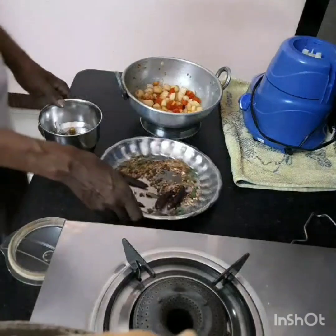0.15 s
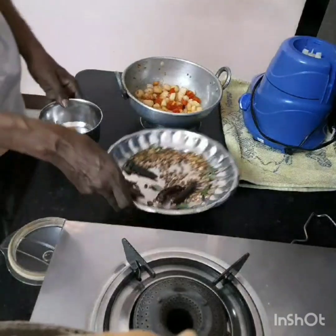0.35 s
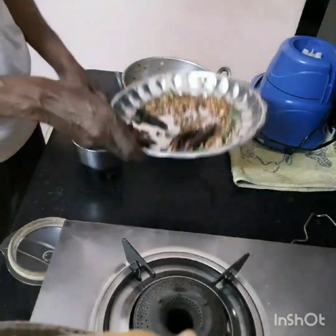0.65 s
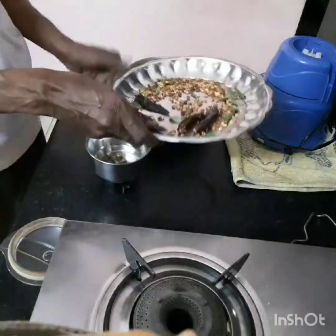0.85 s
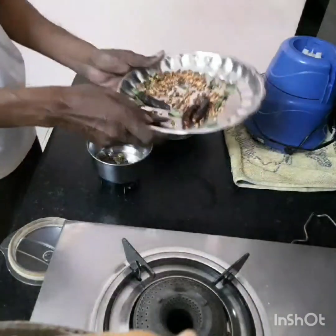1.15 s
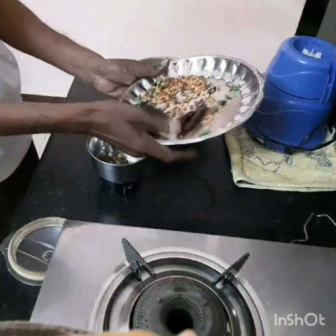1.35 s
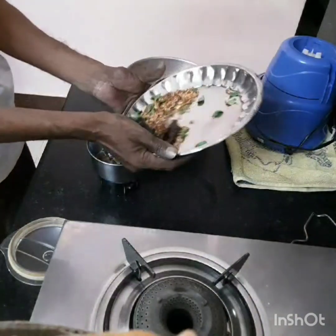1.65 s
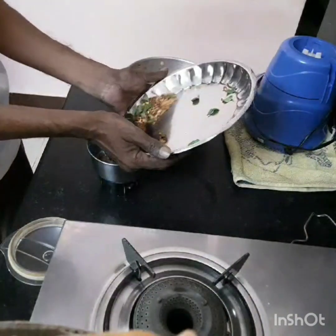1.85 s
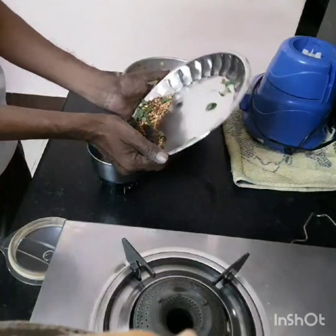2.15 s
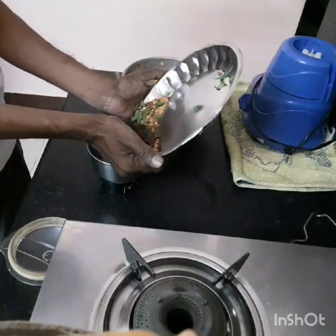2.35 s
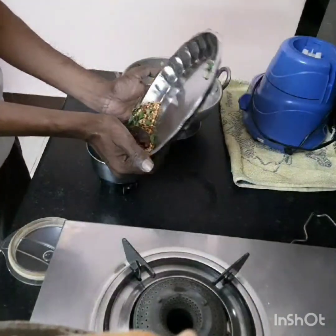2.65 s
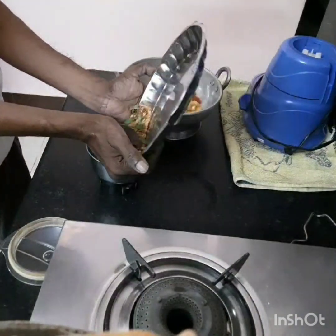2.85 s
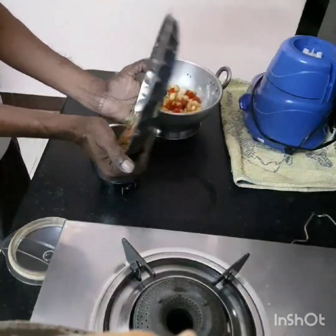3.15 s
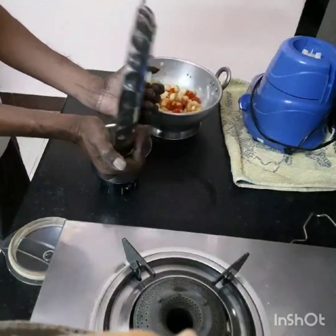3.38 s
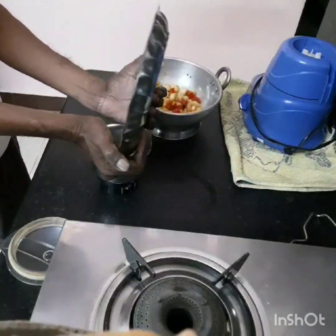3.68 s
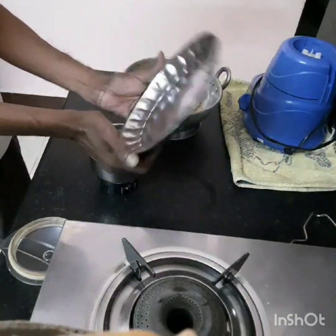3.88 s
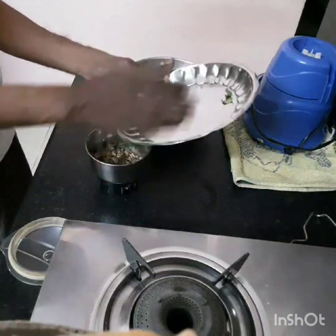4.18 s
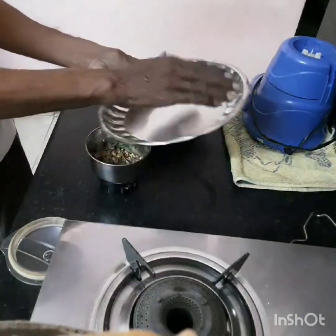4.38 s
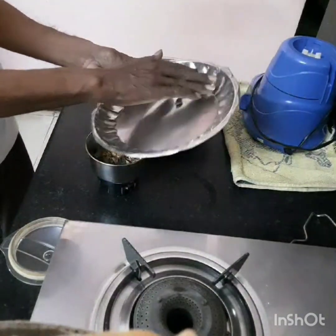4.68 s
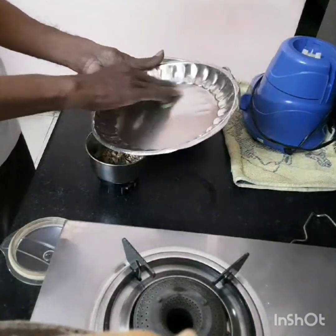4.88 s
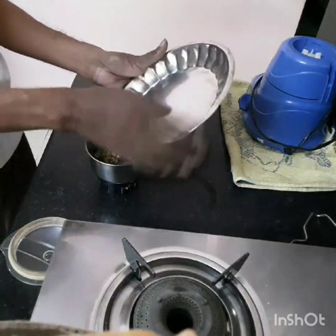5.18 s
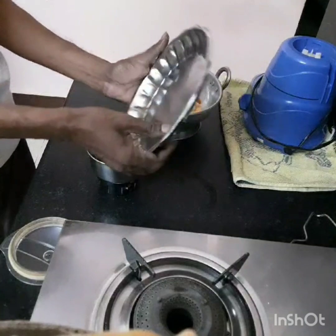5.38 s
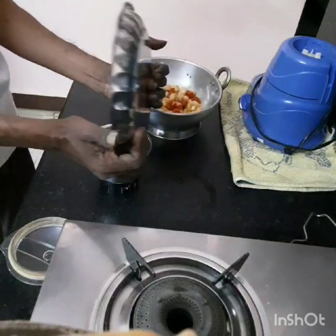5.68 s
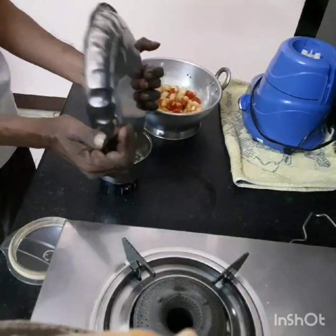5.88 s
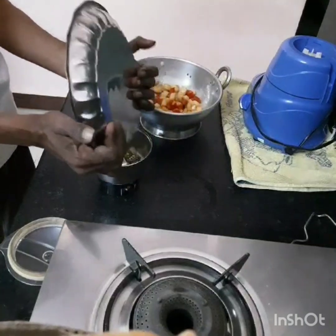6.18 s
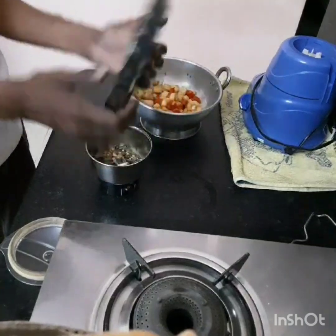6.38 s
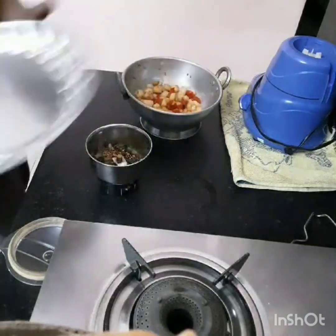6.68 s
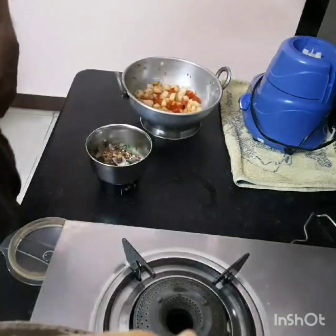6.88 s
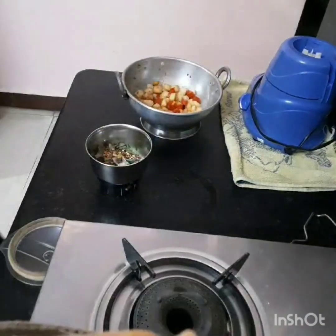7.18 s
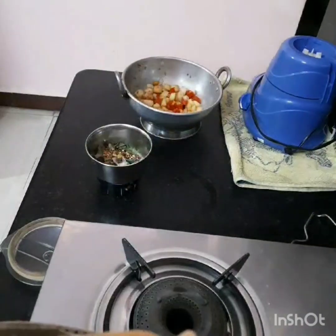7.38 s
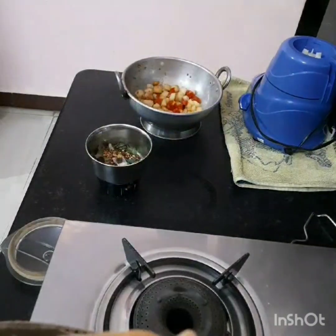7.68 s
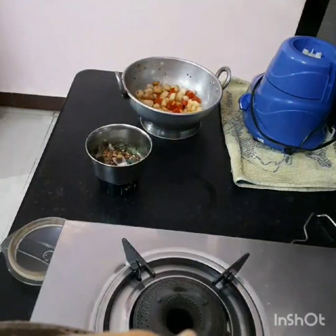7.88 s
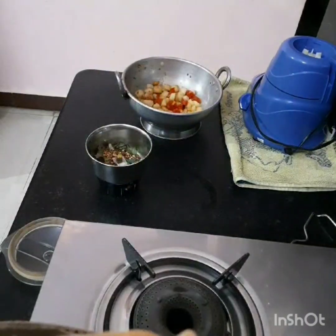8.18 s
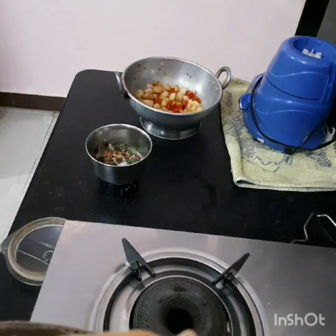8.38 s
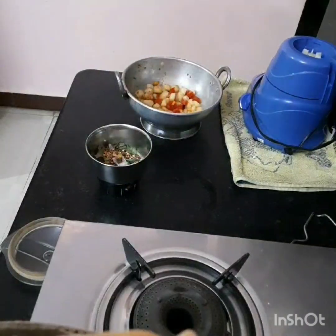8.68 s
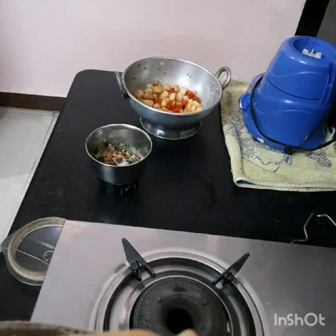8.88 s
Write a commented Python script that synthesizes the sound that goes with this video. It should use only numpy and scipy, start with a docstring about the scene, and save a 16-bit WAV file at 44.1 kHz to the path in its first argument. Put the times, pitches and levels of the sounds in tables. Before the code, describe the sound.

Gritty metal scraping opens, with dry grains shifting in surges on a steel plate. Single grains snap into a jar before a short bright pour that dulls as it fills, with steel edges buzzing and pinging. Then come a pat, crumbs brushed off, knocks with steel ticks, rustling clothes and a reverberant two-part clatter. Faint rumble, hiss and hum remain in the lively kitchen.

```python
"""Dry dal and spices slide off a steel plate into a steel jar: random tiny impacts filtered by plate, jar and heap.
Plate and jar first scrape over the counter as stick-slip noise with sinking resonances; the rim chatters on the jar.
A palm sweeps, pats and knocks the plate clean, then it is put down with a clatter: impacts into resonant steel.
Hands, cloth and soft bumps are grain noise; rumble, hiss and hum lie below. A hard-walled kitchen reverberates."""
import sys
import numpy as np
from scipy import signal
from scipy.fft import rfft, irfft, next_fast_len
from scipy.io import wavfile

SR = 44100
rng = np.random.default_rng(int(sys.argv[2]) if len(sys.argv) > 2 else 0)


def wrap_up_sound(samples):
    """Save the sound to the file named by the first command line argument, as 16-bit audio."""
    columns = np.atleast_2d(samples).T
    # keep every value between -1 and 1, then stretch to whole-number steps
    tamed = np.clip(columns, -1, 1)
    steps = np.round(tamed * 32767).astype(np.int16)
    wavfile.write(sys.argv[1], SR, steps)


N = 398663
T = np.arange(N) / SR


def amp(db):
    """Decibels to gain."""
    return 10 ** (np.asarray(db) / 20)


def unit(x):
    """Scale to an energy of one."""
    return x / np.sqrt(np.sum(x ** 2, axis=-1, keepdims=True))


def along(points, freqs_hz):
    """Interpolate (Hz, value) points on a log-frequency axis."""
    hz, value = np.transpose(points)
    return np.interp(np.log(freqs_hz + 1), np.log(hz), value)


def loudness(curve):
    """Gain over time from (s, dB) rows, silent outside them."""
    s, db = np.transpose(curve)
    inside = (T >= s[0]) * (T <= s[-1])
    return amp(np.interp(T, s, db)) * inside


def swells(rows, step=32, roundness=1.47):
    """Gain of (peak s, dB, rise s, fall s) movements; rise and fall are the times to gain or lose 20 dB."""
    t = T[::step]
    power = 0
    for s, db, rise_s, fall_s in rows:
        away = np.abs(np.where(t < s, (t - s) / rise_s, (t - s) / fall_s))
        # roundness: 1 is a pointed peak, 2 a bell
        power = power + amp(db - 20 * away ** roundness) ** 2 * (away < 2)
    return np.interp(T, t, np.sqrt(power))


def walk(rate_hz):
    """Random wander: normal knots at rate_hz, joined by straight lines."""
    knots = rng.standard_normal(int(N / SR * rate_hz) + 2)
    return np.interp(T * rate_hz, np.arange(len(knots)), knots)


def body(force, colour, modes=(), size=16384):
    """Pass a force through a causal minimum-phase body: a broad colour with resonances standing out of it."""
    f = np.arange(size // 2 + 1) * SR / size
    peaks = sum(amp(db) ** 2 / (1 + (2 * (f - hz) / width_hz) ** 2) for hz, width_hz, db in modes)
    magnitude = amp(along(colour, f)) * np.sqrt(1 + peaks)
    cepstrum = irfft(np.log(magnitude))
    # folding the cepstrum makes the response causal
    response = irfft(np.exp(rfft(2 * cepstrum[:size // 2], size)))
    return signal.oaconvolve(force, unit(response[:size // 2]))[:N]


def grains(gain, per_s, scatter_db, surge_db):
    """Random tiny impacts, per_s a second at the peak; a weaker flow has fewer of them, and it comes in surges."""
    on = np.flatnonzero(gain)
    chance = np.clip(per_s / SR * np.sqrt(gain[on] / gain.max()), 1e-6, 1)
    luck, size, side = rng.random(N)[on], rng.standard_normal(N)[on], rng.random(N)[on]
    sizes = amp(scatter_db * size.clip(-2, 2)) * np.sign(side - .5)
    # rarer impacts are larger, so the level follows gain
    hits = (luck < chance) * sizes / sizes.std() / np.sqrt(chance)
    force = np.zeros(N)
    force[on] = hits * gain[on] * amp(surge_db * walk(60)[on])
    return force


def blows(rows, buzz_db=0, size=4096):
    """Force of (s, dB, contact s) blows: one clean impact plus a buzz of contacts that dies away."""
    force, t = np.zeros(N + size), np.arange(size) / SR
    for s, db, contact_s in rows:
        buzz = unit(rng.standard_normal(size) * np.exp(-t / contact_s))
        blow = amp(buzz_db) * buzz
        blow[0] += 1
        start = int(s * SR)
        force[start:start + size] += amp(db) * unit(blow)
    return force[:N]


def ticks(rows, contact_s):
    """Force of (s, dB) hard, short impacts that skid a little."""
    return blows([(s, db, contact_s) for s, db in rows], buzz_db=9)


def two_ports(size, shared_hz=850, bass_share=0.81):
    """Diffuse noise at two microphones: the bass is mostly shared, the treble is not."""
    f = np.arange(size // 2 + 1) * SR / size
    mid, side = rfft(rng.standard_normal((2, size)))
    alike = bass_share / (1 + (f / shared_hz) ** 4)
    common = mid * np.sqrt(1 + alike)
    opposed = np.array([[1], [-1]]) * side * np.sqrt(1 - alike)
    return irfft((common + opposed) / np.sqrt(2), size)


# standing waves of the kitchen: (frequency [Hz], t60 [s], level [dB])
STANDING_WAVES = [(102.64, 1.5, -27.5), (206, .7, -21.5)]
# reverberation of the kitchen: (frequency [Hz], t60 [s])
REVERB_T60 = [(100, .9), (260, 0.53), (700, 0.6), (1840, .5), (4850, 0.49), (12800, 0.44)]


def kitchen(size=65536, early_db=-4, early_decay_s=0.0082, build_up_s=0.0044):
    """Room response: quick reflections off counter and wall, a diffuse tail and low standing waves."""
    t = np.arange(size) / SR
    f, frame_s, tail = signal.stft(two_ports(size), SR, nperseg=512)
    t60 = along(REVERB_T60, f)[:, None]
    tail = signal.istft(tail * np.exp(-np.log(1000) * frame_s / t60), SR)[1][:, :size]
    response = unit(tail * (1 - np.exp(-t / build_up_s)))
    response += amp(early_db) * unit(two_ports(size) * np.exp(-t / early_decay_s))
    for hz, t60_s, db in STANDING_WAVES:
        wave = np.sin(2 * np.pi * hz * t) * np.exp(-np.log(1000) * t / t60_s)
        response += amp(db) * unit(wave)
    return unit(response)


def panned(x, left_re_right_db):
    """Tip a stereo pair: positive to the left, negative to the right."""
    return x * amp(np.array([[left_re_right_db], [-left_re_right_db]]) / 2)


def placed(x, direct_db, left_re_right_db, right_lag_samples=4):
    """A source in the kitchen; its direct sound reaches the left microphone first."""
    response = kitchen()
    response[[0, 1], [0, right_lag_samples]] += amp(direct_db)
    wet = signal.fftconvolve(x[None], unit(response), axes=1)[:, :N]
    return panned(wet, left_re_right_db)


def moving(x, direct_db, left_re_right_db, path_cycle_hz=1.5):
    """A source in moving hands: its sound shifts between two paths through the room."""
    angle = np.pi * path_cycle_hz * T
    first = placed(x * np.cos(angle), direct_db, left_re_right_db)
    second = placed(x * np.sin(angle), direct_db, left_re_right_db, right_lag_samples=2)
    return first + second


# rumble and hiss colour: (frequency [Hz], level [dB])
AIR_COLOUR = [(20, -40), (32, -26.5), (52, -6.5), (100, -6.5), (150, -8.5), (250, -15.5), (320, -13),
              (500, -19.5), (1240, -28), (2800, -37), (6000, -38), (15500, -36)]
# mains hum partials: (frequency [Hz], level [dB])
MAINS_HUM = [(51, -85), (101, -77.5), (201, -81.5)]


def background(air_db=-72.5, ring_hz=3068, ring_db=-90, ring_end_s=.3):
    """Rumble and hiss as filtered noise, hum as wavering sines, a faint thin ring at the start."""
    noise = two_ports(next_fast_len(N + 1, True))[:, :N]
    air = np.array([body(port, AIR_COLOUR) for port in noise])
    hum = 0
    for hz, db in MAINS_HUM:
        level = amp(db + 0.96 * walk(5.9)) * np.sqrt(2)
        hum = hum + level * np.sin(2 * np.pi * hz * T + .5 * walk(1.3))
    ring = amp(ring_db) * np.sqrt(2) * np.sin(2 * np.pi * ring_hz * T) * (T < ring_end_s)
    return air * amp(air_db + 0.56 * walk(3)) + hum + ring


# hands and sleeves on the plate: (peak time [s], level [dB])
BRUSH_TOUCHES = [(4.031, -62.5), (6.47, -70), (6.579, -58.5), (6.678, -53.5), (6.821, -64), (7.109, -66),
                 (7.49, -68.5), (9.02, -80)]
# clothes rustling: (peak time [s], level [dB])
CLOTH_FOLDS = [(4.3, -71.5), (6.68, -62.5), (7.33, -70), (7.479, -67)]
# brushed plate colour: (frequency [Hz], level [dB])
BRUSH_TONE = [(240, -30.5), (400, 3), (784, -11.5), (1400, -26.5), (2430, -0.5), (5000, -6.5), (6990, -2.5),
              (7670, -7), (15500, -17.5)]
# cloth colour: (frequency [Hz], level [dB])
CLOTH_TONE = [(100, -5), (400, 2.5), (1100, -9.5), (1700, -19), (6000, -37)]
# soft bump colour: (frequency [Hz], level [dB])
SHUFFLE_TONE = [(25, -38.5), (60, 3.5), (110, 0.5), (190, -6.5), (400, -14), (1500, -43.5)]


def handling(shuffle_start_s=.13, shuffle_end_s=3.9, shuffle_db=-65, calm_db_per_s=2):
    """Brushing hands, rustling clothes and the cook's soft bumps: dense to sparse contacts, each coloured."""
    touches = swells([(s, db, 0.09, 0.069) for s, db in BRUSH_TOUCHES])
    folds = swells([(s, db, .13, 0.16) for s, db in CLOTH_FOLDS])
    busy = amp(shuffle_db - calm_db_per_s * T) * (T > shuffle_start_s) * (T < shuffle_end_s)
    brush = grains(touches, per_s=3500, scatter_db=4, surge_db=2.2)
    cloth = grains(folds, per_s=3000, scatter_db=3, surge_db=2.5)
    bumps = grains(busy, per_s=150, scatter_db=3, surge_db=3)
    return body(brush, BRUSH_TONE) + body(cloth, CLOTH_TONE) + body(bumps, SHUFFLE_TONE)


def plate_free(moves_s=0.2, loosens_s=.02):
    """Goes from 0 to 1 as the plate breaks free of the counter."""
    return np.clip((T - moves_s) / loosens_s, 0, 1)


def bend(x, centre_s, sag_hz_per_s, size=65536):
    """Shift an early scrape steadily down in frequency, through zero shift at centre_s; silent after size."""
    shift_hz = sag_hz_per_s * (centre_s - T[:size])
    turn = np.exp(2j * np.pi * np.cumsum(shift_hz) / SR)
    return np.pad(np.real(signal.hilbert(x[:size]) * turn), (0, N - size))


# plate scraped off the counter: (peak time [s], level [dB], rise [s], fall [s])
PLATE_SCRAPE = [(.322, -35.5, .14, 0.096)]
# jar dragged under the plate: (peak time [s], level [dB], rise [s], fall [s])
JAR_SCRAPE = [(.83, -39.5, .27, 0.32)]
# plate scrape colour: (frequency [Hz], level [dB])
PLATE_SCRAPE_COLOUR = [(100, -9.5), (300, 1), (900, -8), (1600, -5), (3000, 0.5), (5000, -4.5),
                       (9000, -2.5), (15000, -11)]
# jar scrape colour: (frequency [Hz], level [dB])
JAR_SCRAPE_COLOUR = [(100, -12), (250, 0.5), (700, -3), (1450, -6.5), (2300, -1.5), (3600, -1), (5000, -33),
                     (15000, -16)]
# plate resonances on the counter: (frequency [Hz], width [Hz], level re colour [dB])
PLATE_SCRAPE_MODES = [(602, 68, 19), (1246, 170, 18), (2250, 120, 9), (2715, 130, 8.5)]
# jar resonances on the counter: (frequency [Hz], width [Hz], level re colour [dB])
JAR_SCRAPE_MODES = [(335, 21, 19.8), (505, 71, 18.8), (956, 130, 10.2), (2200, 450, 5.6)]


def dragging():
    """Plate and jar stick and slip over the stone counter; resonances sink as the pressure eases."""
    plate_slips = grains(swells(PLATE_SCRAPE) * plate_free(), per_s=5000, scatter_db=3, surge_db=1.5)
    jar_slips = grains(swells(JAR_SCRAPE), per_s=2500, scatter_db=3, surge_db=1.5)
    plate = body(plate_slips, PLATE_SCRAPE_COLOUR, PLATE_SCRAPE_MODES)
    jar = body(jar_slips, JAR_SCRAPE_COLOUR, JAR_SCRAPE_MODES)
    return bend(plate, centre_s=.347, sag_hz_per_s=690) + bend(jar, centre_s=.89, sag_hz_per_s=240)


# grains set sliding by jolts and tilts: (peak time [s], level [dB], rise [s], fall [s])
SLIDES = [(.345, -36, .125, 0.11), (.93, -40, .36, 0.2), (1.335, -37.5, 0.13, 0.07),
          (1.6, -41.5, 0.068, 0.33), (1.77, -44, 0.22, .13), (1.985, -40, 0.29, .18),
          (2.5, -47.5, 0.11, 0.28)]
# palm strokes over the plate: (peak time [s], level [dB], rise [s], fall [s])
PALM_SWEEPS = [(4.86, -57, 0.27, 0.35), (5.265, -48.5, 0.24, 0.053), (5.72, -69.5, 0.6, 0.18)]
# sliding grain colour: (frequency [Hz], level [dB])
SLIDE_TONE = [(150, -53.5), (250, -19.5), (385, -13), (583, -7.5), (823, -11.5), (1120, -5.5),
              (1430, -11.5), (2490, -1.5), (3960, -4), (7000, 1), (7640, -2.5), (12200, -5.5), (15500, -13)]
# plate colour under crumbs: (frequency [Hz], level [dB])
PLATE_TONE = [(300, -21), (1000, -17), (1800, -18.5), (2500, -1), (3700, -1.5), (6200, 6.5), (8200, 2.5),
              (11500, 3), (15000, -4.5)]
# plate resonances: (frequency [Hz], width [Hz], level re colour [dB])
PLATE_RESONANCES = [(289.4, 30, 5.1), (2420, 28, 5.2), (2878, 60, 11), (4300, 83, 7.7), (6870, 220, 5.1),
                    (10900, 68.7, 8.8)]


def sliding():
    """Dal hisses down the plate as dense impacts; later a palm rolls sparser crumbs over it."""
    slips = grains(swells(SLIDES) * plate_free(), per_s=9000, scatter_db=5, surge_db=1.5)
    crumbs = grains(swells(PALM_SWEEPS), per_s=1100, scatter_db=4.5, surge_db=3.0)
    return body(slips, SLIDE_TONE) + body(crumbs, PLATE_TONE, PLATE_RESONANCES)


# lone hard grains on the jar: (time [s], strength [dB])
JAR_GRAINS = [(2.7133, -9), (2.7483, -10.5), (2.7852, -15), (2.8382, 2), (2.8505, -10.5), (3.0311, -0.5),
              (3.0875, -5.5), (3.314, -5), (5.9429, -15.5)]
# crumbs ticking on the plate: (time [s], strength [dB])
PLATE_CRUMBS = [(2.213, -27), (2.3162, -30.5), (2.3901, -25.5), (2.4464, -20), (2.4968, -16.5),
                (4.7642, -23.5), (4.8465, -33), (4.8909, -25), (4.9777, -18), (5.063, -13), (5.096, -22),
                (5.1154, -11), (5.1598, -9.5), (5.4975, -30.5), (5.5544, -33), (5.64, -38)]
# jar colour: (frequency [Hz], level [dB])
JAR_TONE = [(200, -15.5), (500, -4), (1000, -7), (1550, -33.5), (2300, -7), (4200, -7.5), (6000, 1),
            (8000, 2.5), (10000, -0.5), (15000, -0.5)]
# jar resonances: (frequency [Hz], width [Hz], level re colour [dB])
JAR_RESONANCES = [(6805, 160, 16.9), (7200, 57, 6.1), (7210, 110, 11), (7960, 26.5, 3.4), (7760, 48, 13),
                  (8650, 25, 7.5), (9200, 57, 12), (9000, 50, 13), (13000, 79, 8.3)]


def strays():
    """Lone hard grains snap against jar and plate: short impacts into each body."""
    jar = body(ticks(JAR_GRAINS, contact_s=.0016), JAR_TONE, JAR_RESONANCES)
    plate = body(ticks(PLATE_CRUMBS, contact_s=0.0025), PLATE_TONE, PLATE_RESONANCES)
    return jar + plate


# grain flow into the jar, a trickle, the rush, the last few: (time [s], level [dB])
POUR_FLOW = [(2.70, -47.5), (2.98, -38.5), (3.07, -30.5), (3.52, -36.5), (3.6, -49.5), (3.85, -69)]
# grain-on-grain colour: (frequency [Hz], level [dB])
HEAP_TONE = [(150, -16.5), (350, -13.5), (1600, 0), (3000, -1.5), (4100, -2), (5600, 4.5), (9000, -3),
             (12000, 0), (15000, -2.5)]


def pouring(heap_share_empty=.015, heap_share_full=0.97):
    """Grains ring the bare jar, then land more dully on each other as the heap grows."""
    flow = loudness(POUR_FLOW)
    filled = np.cumsum(flow ** 2) / np.sum(flow ** 2)
    heap_share = heap_share_empty + (heap_share_full - heap_share_empty) * filled
    wall = grains(flow * np.sqrt(1 - heap_share), per_s=600, scatter_db=5, surge_db=2.2)
    heap = grains(flow * np.sqrt(heap_share), per_s=1100, scatter_db=5, surge_db=1.5)
    return body(wall, JAR_TONE, JAR_RESONANCES) + body(heap, HEAP_TONE)


# rim pressed along the jar's lip: (peak time [s], level [dB], rise [s], fall [s])
RIM_PRESSURE = [(3.24, -31, .3, .13), (3.499, -37, 0.38, .12)]
# rim bumping the jar: (time [s], strength [dB])
RIM_BUMPS = [(3.1135, 4), (3.641, -11)]
# steel edge glancing off steel: (time [s], strength [dB], contact [s])
EDGE_GLANCES = [(2.908, -6.5, 0.0063), (3.516, 2, 0.0053), (3.527, -19.5, 0.0069)]
# rim chatter colour: (frequency [Hz], level [dB])
CHATTER_TONE = [(150, -18), (320, 2), (700, -6), (1100, 1), (1600, -5.5), (2600, 2.5), (4000, -0.5),
                (8000, 1.5), (15000, -26.5)]
# rim-on-jar resonances: (frequency [Hz], width [Hz], level re colour [dB])
RIM_RESONANCES = [(888.5, 28, 5.1), (1010, 120, 13), (1261, 20, 6), (2230, 120, 7), (2213, 30, 15),
                  (2316, 170, 14), (3000, 22, 2.8), (3390, 40, 6.9)]
# bright edge resonances: (frequency [Hz], width [Hz], level re colour [dB])
EDGE_RESONANCES = [(7660, 19, 11), (7710, 16, 11), (8118, 43, 25.5), (8672, 17, 14), (8770, 17, 21),
                   (12000, 30, 13), (12870, 30, 14), (12900, 38, 13), (12500, 16, 21), (13400, 20, 16),
                   (13850, 70, 21), (14600, 30, 17)]


def rim(slips_hz=72, unevenness=.25, scatter_db=0.4, count=64):
    """From its first bump the plate's rim slips over the jar's lip in uneven jerks; glances ring brightly."""
    gaps, size = rng.standard_normal((count, 2)).T
    times_s = RIM_BUMPS[0][0] + np.cumsum(np.exp(unevenness * gaps)) / slips_hz
    jerks = ticks(zip(times_s, scatter_db * size), contact_s=0.0017)
    slips = jerks * np.sqrt(SR / slips_hz) * swells(RIM_PRESSURE)
    chatter = body(slips + ticks(RIM_BUMPS, contact_s=0.0026), CHATTER_TONE, RIM_RESONANCES)
    return chatter + body(blows(EDGE_GLANCES, buzz_db=3.5), JAR_TONE, EDGE_RESONANCES)


# knocks that shake the plate: (time [s], thud strength [dB], tick strength [dB], thud contact [s])
PLATE_KNOCKS = [(3.425, -7, -33, 0.013), (5.811, -9.5, -9, 0.064), (6.0503, -3.5, -5, 0.045),
                (6.172, -.5, -5, .014), (6.2, -1, -46, 0.0076)]
# palm landing on the plate's face: (time [s], strength [dB], contact [s])
PALM_PATS = [(4.5955, -8.5, 0.0096), (4.993, -19, 0.0092)]
# thud colour: (frequency [Hz], level [dB])
THUD_TONE = [(25, -44.5), (55, -10.5), (98, 0.5), (150, -13.5), (210, -3.5), (350, -3.5), (600, -1.5),
             (1000, -4.5), (1450, -18), (2300, -12.5), (4000, -38.5), (12000, -41.5)]
# steel tick colour: (frequency [Hz], level [dB])
TICK_TONE = [(300, -13.5), (1300, -4), (1900, 0), (2500, 11), (3200, 0), (4800, -1.5), (6500, -0.5),
             (9000, -7), (15000, -15)]
# pat colour: (frequency [Hz], level [dB])
PAT_TONE = [(100, -13), (190, -0.5), (265, 5.5), (450, -6), (1000, -12), (1800, -10), (3100, 2.5),
            (4300, -4.5), (7000, -7), (15000, -25)]
# gripped plate resonances: (frequency [Hz], width [Hz], level re colour [dB])
HELD_RESONANCES = [(190.2, 16, 14), (300, 17, 7.4), (498, 24, 2.5), (909, 24, 3.5), (2540, 45, 1.8)]


def knocking():
    """The hand pats and knocks the plate; the grip damps it to a thud under a steel tick."""
    s, thud_db, tick_db, contact_s = np.transpose(PLATE_KNOCKS)
    thuds = body(blows(zip(s, thud_db, contact_s), buzz_db=6.0), THUD_TONE, HELD_RESONANCES)
    steel = body(ticks(zip(s, tick_db), contact_s=.005), TICK_TONE)
    pats = body(blows(PALM_PATS, buzz_db=4.5), PAT_TONE, PLATE_RESONANCES)
    return thuds + steel + pats


# plate put down across the room: (time [s], strength [dB], contact [s])
PUT_DOWN_BLOWS = [(7.756, -6.5, 0.014), (7.773, -7, 0.013), (7.8, -6, 0.04), (7.9274, -10.5, 0.011),
                  (7.956, -7.5, 0.012)]
# clatter colour: (frequency [Hz], level [dB])
CLATTER_TONE = [(50, -17.5), (110, 1.5), (180, -12), (280, -4.5), (600, -12.5), (1130, -12), (1600, -8),
                (2200, -10.5), (2900, -8), (4000, -16.5), (6000, -16.5), (12000, -32.5), (15500, -43)]
# loose plate resonances: (frequency [Hz], width [Hz], level re colour [dB])
LOOSE_RESONANCES = [(152, 10, 4.6), (256, 14, 2.3), (1190, 57, 6.5), (1561, 2.8, 8.4), (2110, 57, 7.4),
                    (2230, 64, 5.2), (2480, 68, 8.4), (2850, 43, 3), (4360, 95, 7.8)]


def putting_down():
    """Buzzing blows make the released plate ring in narrow resonances."""
    return body(blows(PUT_DOWN_BLOWS, buzz_db=6), CLATTER_TONE, LOOSE_RESONANCES, size=65536)


def scene():
    """Place every source; knocks and the last clatter are almost all room."""
    air = panned(background(), left_re_right_db=-4.5)
    plate = moving(handling() + dragging() + sliding(), direct_db=-6.5, left_re_right_db=-0.36)
    grain_ticks = placed(strays(), direct_db=-2, left_re_right_db=1.5)
    jar = placed(pouring() + rim(), direct_db=-6, left_re_right_db=-0.5)
    knocks = placed(knocking(), direct_db=-19.5, left_re_right_db=-1.7)
    clatter = placed(putting_down(), direct_db=-14, left_re_right_db=-1.3, right_lag_samples=9)
    return air + plate + grain_ticks + jar + knocks + clatter


def record(dry, top_hz=15600):
    """The phone cuts the top steeply: an elliptic low-pass."""
    return signal.sosfilt(signal.ellip(10, .2, 80, top_hz, fs=SR, output="sos"), dry)


dry = scene()
out = record(dry)
wrap_up_sound(out)
```